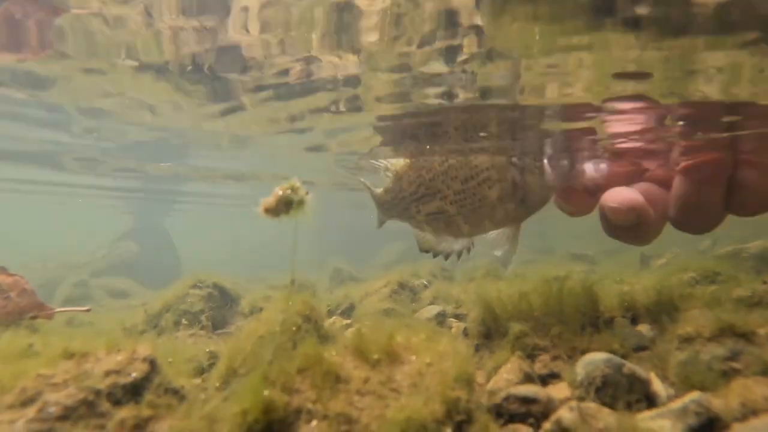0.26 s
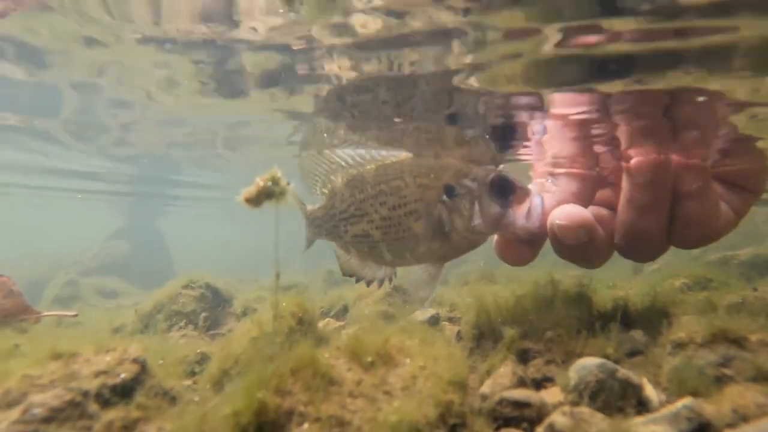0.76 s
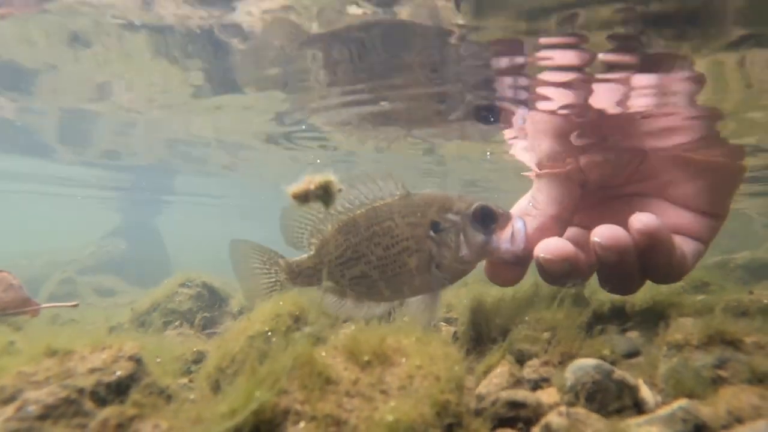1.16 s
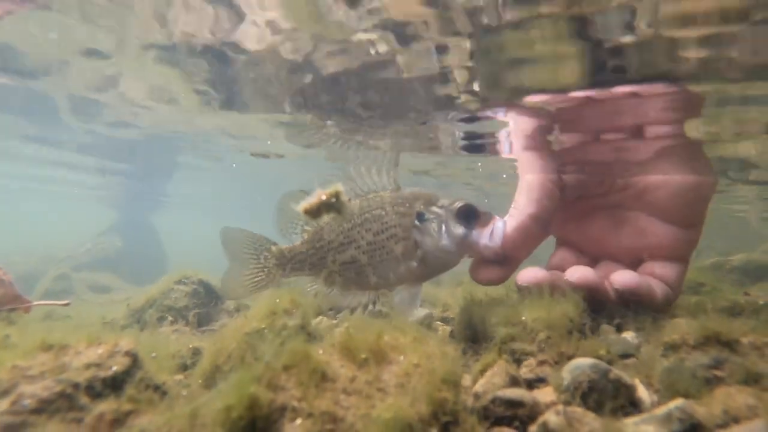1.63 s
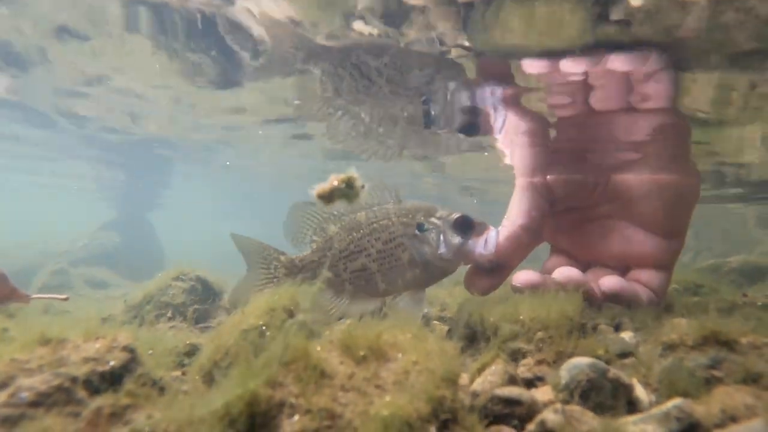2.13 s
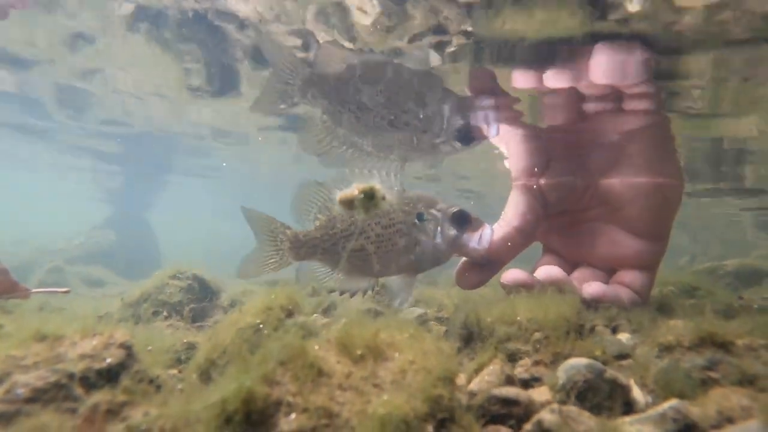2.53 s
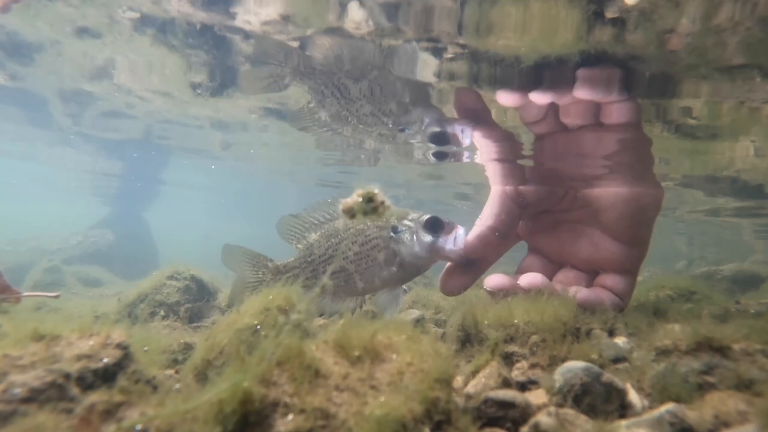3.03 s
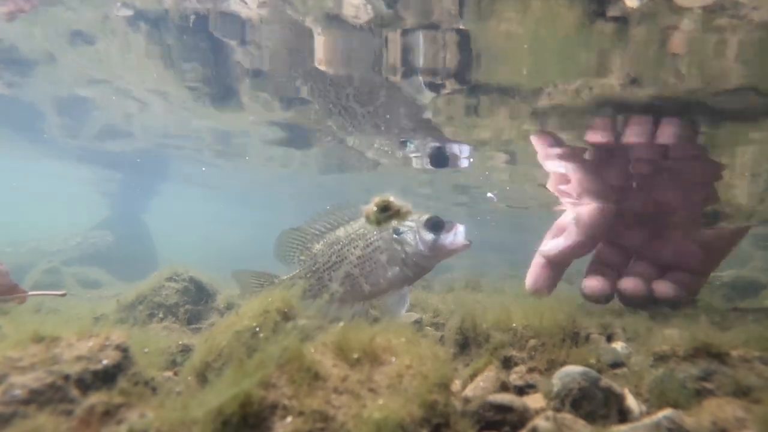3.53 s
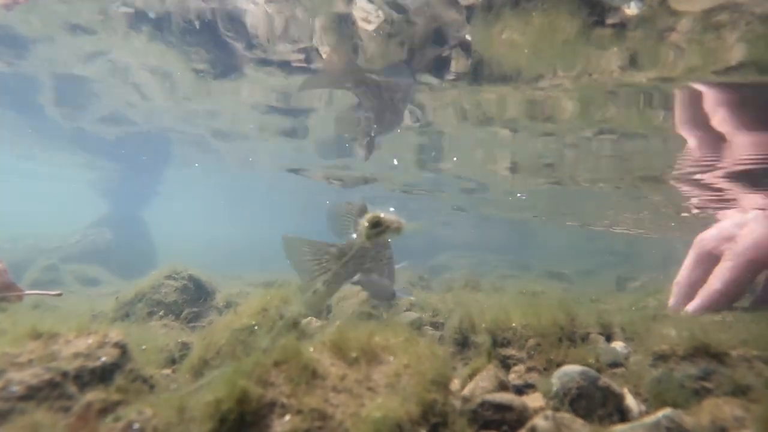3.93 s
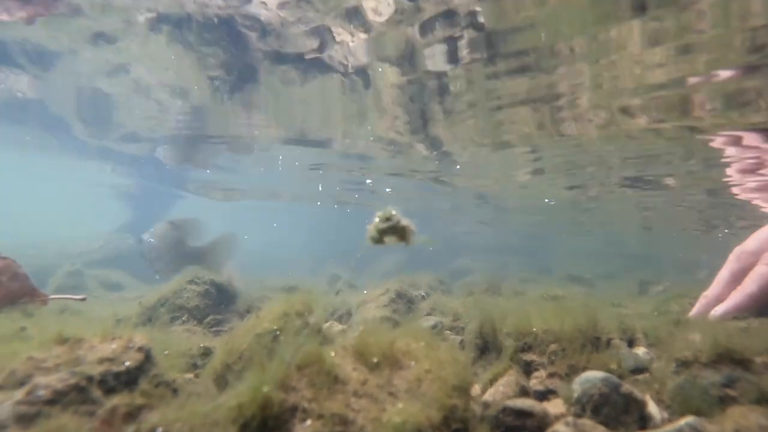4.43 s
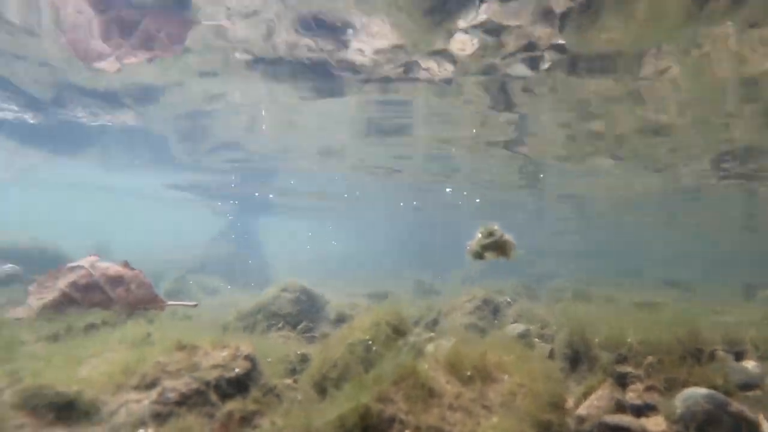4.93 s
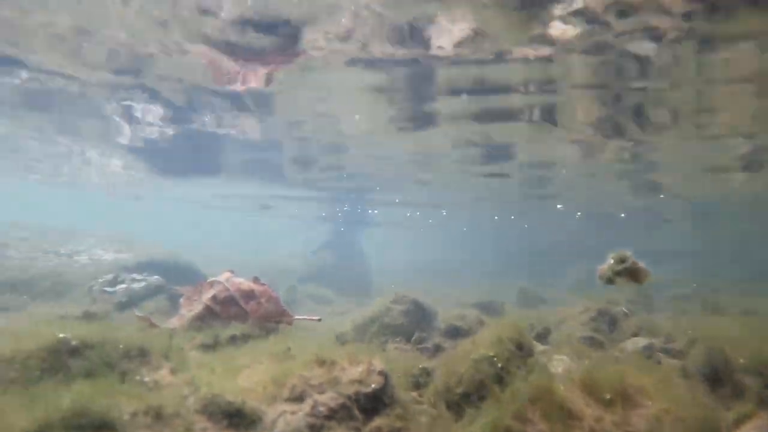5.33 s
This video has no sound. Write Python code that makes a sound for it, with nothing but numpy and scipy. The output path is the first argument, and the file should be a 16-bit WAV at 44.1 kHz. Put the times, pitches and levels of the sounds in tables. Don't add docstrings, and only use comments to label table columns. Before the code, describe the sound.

Muffled underwater rumble surges against a sealed camera while gritty rubs, ticks and hard knocks crowd the first half, then thin out.

```python
import sys
import numpy as np
from scipy import signal
from scipy.fft import rfft, irfft, next_fast_len
from scipy.io import wavfile
from scipy.ndimage import uniform_filter1d, map_coordinates

SR = 44100
rng = np.random.default_rng(int(sys.argv[2]) if len(sys.argv) > 2 else 0)


def invert_db(x):
    u = np.asarray(x, float) / 20
    return 10 ** u


def inscribe(sig):
    pcm = np.round(np.clip(np.atleast_2d(sig).T, -1, 1) * 32767)
    wavfile.write(sys.argv[1], SR, pcm.astype(np.int16))


N = 245637


def unit(x):
    return x / np.sqrt(np.mean(x ** 2) + 1e-20)


def curves(rows):
    s, *cols = np.transpose(rows)
    return [np.interp(np.arange(N) / SR, s, c) for c in cols]


def wobble(rate):
    knots = rng.standard_normal(int(N * rate / SR) + 4)
    return map_coordinates(knots, [np.arange(N) * rate / SR])


def filtered(x, response):
    m = next_fast_len(N + SR // 2)
    return irfft(rfft(x, m) * response(np.fft.rfftfreq(m, 1 / SR)), m)[:N]


def noise(spectrum):
    f, db = np.transpose(spectrum)
    white = rng.standard_normal(N)
    return unit(filtered(white, lambda hz: invert_db(np.interp(np.log(hz + 1), np.log(f + 1), db))))


def even(x, share, size):
    power = np.abs(uniform_filter1d(x ** 2, size))
    return unit(x / (power + 0.03) ** (share / 2))


def swells(rows, rise, fall, rest_db):
    t = np.arange(0, N, 64) / SR
    power = invert_db(2 * rest_db[::64])
    for s, hold, db in rows:
        power = power + invert_db(2 * (db - rise * np.maximum(s - t, 0) - fall * np.maximum(t - s - hold, 0)))
    return np.interp(np.arange(N) / SR, t, 10 * np.log10(power))


def add(track, s, sound):
    part = track[round(s * SR):][:len(sound)]
    part += sound[:len(part)]


def sweep(t, first_ms, growth):
    growth = max(growth, 1.2)
    half_swings = np.log1p(t * 1000 * (growth - 1) / max(first_ms, .1)) / np.log(growth)
    return np.sin(np.pi * half_swings)


def shell(hz):
    # f/Hz, bandwidth/Hz, level/dB
    shell_modes = [(563, 258, 0.5), (1345, 410, -1.5), (1985, 335, -2.5), (2890, 544, -3.5),
                   (3940, 1930, -11.5), (5660, 1300, -40)]
    modes = 0
    for k, (c, width, db) in enumerate(shell_modes):
        modes = modes + (-1) ** k * invert_db(db) * 1j * hz * width / (c * c - hz * hz + 1j * hz * width)
    dead_hz, dead_width_hz, depth = 2440, 890, 0.25
    notch = 1 - depth * 1j * hz * dead_width_hz / (dead_hz ** 2 - hz * hz + 1j * hz * dead_width_hz)
    return notch * modes / (1 + 1j * hz / 5000) ** 2


def self_noise():
    # f/Hz, level/dB per Hz
    hiss_spectrum = [(200, -4), (2000, -25.5), (5000, -42), (6200, -58.5), (7000, -79.5), (16000, -84)]
    return invert_db(-94.5 + 3 * wobble(25)) * noise(hiss_spectrum)


def buzz():
    # start t/s, end t/s
    buzz_spans = [(.12, .15), (.2, .28), (.43, .55), (.66, .69), (.85, .93), (1.02, 1.05), (1.15, 1.27),
                  (1.3, 1.55), (1.75, 1.85), (1.95, 2.2), (2.9, 3.05), (3.25, 3.45), (3.95, 4.05),
                  (4.2, 4.3), (4.5, 4.54), (4.78, 4.82), (4.95, 5), (5.15, 5.5)]
    sputter_db = [-62, -53, -47, -44, -45, -56, -62, -48, -51, -70, -70, -66, -60, -52, -53]
    click_hz, buzz_db, sputter_s = 375, -68, 4.5418
    t, clicks = np.arange(N) / SR, np.zeros(N)
    at = np.arange(0, N - 1, SR / click_hz).round().astype(int)
    active = sum((t[at] > start) & (t[at] < end) for start, end in buzz_spans)
    clicks[at] = invert_db(buzz_db + 3.7 * wobble(45)[at]) * active
    comb = filtered(clicks, lambda hz: 1 / (1 + (4000 / (hz + 1)) ** 4) / (1 + (hz / 13000) ** 16))
    sputter_t = sputter_s + 2 * np.arange(len(sputter_db)) / click_hz
    comb[np.round(sputter_t * SR).astype(int)] += invert_db(sputter_db)
    return comb


def recorder_slips():
    # t/s, jump/full scale, recovery/ms
    slip_events = [
        (.74526, -.03, 3),
        (2.74528, .075, 4),
        (3.74528, -.19, 5),
        (4.74526, -.014, 3),
    ]
    jumps, t = np.zeros(N), np.arange(SR // 40) / SR
    for s, jump, recovery_ms in slip_events:
        add(jumps, s, jump * np.cos(np.pi / 2 * np.clip(t * 1000 / recovery_ms, 0, 1)) ** 2)
    return filtered(jumps, lambda hz: 1 / (1 + (hz / 15800) ** 8))


def end_offsets():
    out, t = np.zeros(N), np.arange(SR // 40) / SR
    opening, closing, ease_s = .125, .09, .012
    ease = np.cos(np.pi / 2 * np.clip(t / ease_s, 0, 1)) ** 2
    add(out, 0, opening * ease)
    add(out, (N - len(t)) / SR, closing * ease[::-1])
    return out


def bubbles():
    # t/s, peak level/dB, f/Hz, t60/s
    bubble_rings = [
        (0.123, -35.5, 1330, 0.04),
        (0.122, -42, 438, 0.021),
        (2.785, -28.5, 121.5, 0.27),
        (3.153, -23, 390, 0.044),
        (3.533, -8, 205, 0.015),
        (3.5464, -15, 231, 0.031),
        (4.11, -16.5, 201, 0.02),
        (4.1197, -11.5, 206, 0.026),
    ]
    out, t = np.zeros(N), np.arange(SR // 8) / SR
    for s, db, hz, t60 in bubble_rings:
        envelope = invert_db(db - 60 * t / t60) * (1 - np.exp(-t / 0.00093))
        add(out, s, envelope * np.sin(2 * np.pi * hz * t * (1 + 0.26 * t)))
    return out


def squeaks():
    # t/s, length/s
    squeak_spans = [(.5, .13), (2.705, .03), (2.748, .085), (3.11, .13), (3.11, .075), (3.13, .045),
                    (3.165, .08), (3.165, .04), (4.68, .52), (4.79, .13), (4.95, .11), (5.31, .07),
                    (5.45, .1), (5.1, .07), (2.766, .024), (4.31, .03)]
    # level/dB, f/Hz, bandwidth/Hz
    squeak_bands = [(-63, 1830, 510), (-59, 2200, 130), (-60, 2130, 90), (-21, 88, 86), (-49.5, 1680, 330),
                    (-30, 368, 36), (-27, 215, 30), (-61, 1600, 490), (-67, 2830, 360), (-51, 767, 120),
                    (-51.5, 820, 170), (-69, 2400, 250), (-68.5, 2960, 326), (-72, 3400, 180),
                    (-49, 1980, 140), (-67, 3100, 1100)]
    out = np.zeros(N)
    for (s, length), (db, centre_hz, width_hz) in zip(squeak_spans, squeak_bands):
        flutter = invert_db(3 * wobble(110)) * rng.standard_normal(N)
        band = filtered(flutter, lambda hz: np.exp(-((hz - centre_hz) / width_hz) ** 4))
        span = round(length * SR)
        add(out, s, invert_db(db) * np.hanning(span) ** 0.19 * unit(band[:span]))
    return out


def knocks():
    # t/s, peak level/dB, first half swing/ms, growth of each swing, t60/s
    blows = [(0.204, -24, 6.7, 0.8, 0.23), (0.352, -18, 4.1, 1.7, 0.068), (0.381, -11, 6.8, 1.3, 0.067),
             (1.437, -22.5, 5, 0.68, 0.22), (4.686, -17, 5.3, 0.94, 0.23), (0.6275, -27.5, 1.3, 4, 0.051),
             (2.4082, -8.5, 0.24, 3.4, 0.12), (2.5934, -20.5, 0.28, 2.8, 0.066),
             (2.6674, -14, 0.26, 2.6, 0.063), (2.7034, -3.5, 0.58, 2.47, 0.067),
             (2.769, -16.5, 1.38, 1.3, 0.044), (2.7771, -12, 0.42, 2.54, 0.055),
             (3.1350, -18.5, 0.66, 1.6, 0.053), (3.138, -11, 0.62, 1.7, 0.046),
             (3.1906, -13.5, 0.84, 1.42, 0.22), (4.4872, -22.5, 1.36, 1.25, 0.021),
             (3.2528, -31.5, 0.88, 2.2, 0.043)]
    out, t = np.zeros(N), np.arange(SR // 8) / SR
    for s, db, first_ms, growth, t60 in blows:
        onset = 1 - np.exp(-t * 1000 / (0.2 * first_ms))
        add(out, s, invert_db(db + 1.0 - 60 * t / t60) * onset * sweep(t, first_ms, growth))
    return signal.sosfilt(signal.butter(10, 2150, fs=SR, output="sos"), out)


def ticks():
    # t/s, peak level/dB, ring f/Hz
    dull_slips = [(0.26, -33.5, 1550), (0.313, -38, 1780), (0.453, -36, 1490), (0.5098, -37, 1830),
                  (0.559, -41, 1730), (0.614, -28.5, 1750), (0.858, -25, 1530), (0.8773, -20, 1550),
                  (0.899, -23, 1570), (0.972, -17, 1570), (1.1413, -27.5, 1640), (1.654, -23.5, 1730),
                  (1.7671, -21, 1650), (1.7773, -24, 1660), (1.8078, -19, 1730), (1.814, -32, 1710),
                  (2.012, -24, 1570), (2.324, -28, 1870), (2.3818, -34, 1800), (2.578, -24, 1610),
                  (2.5932, -9.5, 1710), (2.604, -25, 1870), (2.621, -24, 2040), (2.685, -10.5, 1850),
                  (3.2743, -25, 1860), (3.334, -44, 1760), (4.1089, -17, 1630), (4.118, -16, 1660),
                  (4.992, -32, 1950), (5.1544, -37.5, 1760)]
    # t/s, peak level/dB, ring f/Hz, rattle f/Hz
    sharp_slips = [(0.3533, -29.5, 1600, 2720), (0.377, -24.5, 1290, 2620), (0.983, -37, 1690, 3560),
                   (1.1693, -29, 1820, 3150), (1.5664, -32, 1650, 3180), (1.597, -29.5, 1720, 3320),
                   (1.6028, -23, 1670, 3260), (1.8796, -31.5, 1740, 3900), (1.9723, -22, 1550, 3400),
                   (2.0162, -25, 1680, 2680), (2.1057, -28.5, 2040, 3050), (2.1106, -35, 1640, 3200),
                   (2.303, -26, 1540, 3170), (2.3142, -26.5, 1800, 3180), (2.4934, -23, 1800, 3240),
                   (2.505, -27.5, 1730, 3360), (2.6347, -19.5, 1500, 3000), (2.645, -18, 1610, 2940),
                   (2.6929, -18, 2240, 2860), (2.84, -30, 1710, 3280), (2.8646, -26.5, 1970, 3180),
                   (3.322, -30.5, 1570, 3310), (3.3488, -27.5, 1760, 3200), (3.415, -27, 1720, 3600),
                   (3.431, -26.5, 1910, 3900), (3.53, -16, 1480, 3600), (3.5435, -17.5, 1800, 3870),
                   (3.548, -19.5, 2000, 3270), (3.5926, -33.5, 1630, 3030), (3.5985, -30.5, 1660, 3070)]
    # t/s, peak level/dB
    heavy_slips = [(0.423, -35), (0.486, -42.5), (0.8845, -28.5), (1.215, -34.5), (1.794, -31),
                   (2.0761, -33.5), (2.479, -38), (3.129, -37.5), (3.1974, -40), (3.253, -28.5),
                   (3.84, -30.5), (4.154, -38.5), (4.385, -39), (4.419, -58), (4.44, -56.5), (4.577, -40),
                   (4.598, -47), (1.373, -51), (0.464, -42.5), (2.9723, -48), (3.0077, -44.5), (1.269, -53),
                   (3.9522, -51), (4.245, -44), (2.171, -45), (1.4423, -39.5), (5.173, -46)]
    faint_slips = [(0.041, -38.5), (.072, -38), (0.21, -48), (0.662, -52), (1.0586, -36.5), (1.44, -34),
                   (1.517, -36), (1.9166, -34), (2.269, -37), (2.5496, -32.5), (2.7283, -32), (2.797, -35),
                   (2.804, -31.5), (3.045, -38.5), (3.067, -36), (3.1334, -43), (3.2423, -36.5),
                   (3.523, -37), (3.2, -31), (3.796, -39), (3.862, -41), (4.0255, -41.5), (4.2985, -35),
                   (4.517, -38.5), (4.301, -36), (4.7625, -34), (4.8253, -35), (5.1602, -38),
                   (5.2493, -39.5), (5.3269, -43)]
    crackle_slips = [(0.327, -40), (0.3362, -38), (0.5186, -41), (0.571, -57), (0.6274, -44), (0.827, -54),
                     (0.835, -51), (0.9454, -25), (0.9629, -30), (1.1304, -52), (1.1496, -32.5),
                     (1.2713, -42), (1.488, -39), (1.543, -41), (1.556, -35), (1.6202, -33), (1.715, -37),
                     (1.7385, -32), (1.7874, -30), (1.8525, -46), (1.868, -31), (1.9057, -36.5),
                     (1.9867, -39), (2.027, -24), (2.2047, -40), (2.2108, -42), (2.2878, -37),
                     (2.2907, -28.5), (2.359, -38), (2.5884, -36), (2.6084, -36), (2.6671, -13),
                     (2.7144, -37), (2.7206, -38), (3.1057, -42), (3.1883, -33), (3.2885, -31.5),
                     (3.354, -48), (3.4046, -34), (3.4495, -33), (3.6453, -43), (3.693, -45), (3.699, -41),
                     (3.712, -42), (3.8263, -38), (4.033, -40.5), (4.131, -40), (4.19, -40), (4.208, -38.5),
                     (4.2178, -46), (4.3314, -44), (4.499, -43), (4.5994, -42), (4.802, -39), (4.842, -40),
                     (4.8898, -34.5), (4.9232, -45), (4.9807, -37), (5.0166, -36.5), (5.2523, -49),
                     (5.3383, -43), (5.3544, -55), (4.6349, -31), (4.6852, -40.5), (4.392, -50),
                     (3.7195, -46), (5.058, -43), (5.09, -46), (5.019, -41), (1.7655, -30), (3.774, -38)]
    # rattle level/dB, thud level/dB
    slip_kinds = [
        (-29, -7),
        (-0.5, 1.5),
        (-14.5, 6.5),
        (1.5, -4),
        (-2.5, -1.5),
    ]
    out, scratch, t = np.zeros(N), np.zeros(N), np.arange(SR // 25) / SR
    groups = (dull_slips, sharp_slips, heavy_slips, faint_slips, crackle_slips)
    slips = [(row, *kind) for rows, kind in zip(groups, slip_kinds) for row in rows]
    chance = rng.standard_normal((len(slips), 5))
    grain = rng.standard_normal((len(slips), len(t)))
    rise = 1 - np.exp(-t / .0003)
    for ((s, db, *known), bright_db, thud_db), (a, b, c, d, e), rough in zip(slips, chance, grain):
        drawn = [1700 * invert_db(1.2 * a), 3150 * invert_db(0.87 * b)]
        ring_hz, rattle_hz = [*known, *drawn[len(known):]]
        ring = invert_db(1.0 - 60 * t / 0.0051) * np.sin(2 * np.pi * ring_hz * t)
        rattle = np.sin(2 * np.pi * rattle_hz * t)
        rattle += 0.27 * np.sin(2 * np.pi * 4300 * invert_db(0.5 * c) * t)
        rattle += 0.1 * np.sin(2 * np.pi * 5600 * invert_db(0.7 * d) * t)
        rattle *= invert_db(bright_db + 2.0 - 60 * t / 0.0025)
        thud = invert_db(thud_db - 3.0 - 60 * t / 0.039) * sweep(t, 0.76 * invert_db(2.92 * e), 1.95)
        add(out, s, invert_db(db) * rise * (ring + rattle + thud))
        add(scratch, s, invert_db(db - 3.5 - 60 * t / 0.021) * rough)
    return out + filtered(scratch, shell)


def rubbing():
    # t/s, contact level/dB, dryness/dB (drier skin is brighter)
    grip = [(0, -72, -6), (.1, -76.5, -3), (.26, -70, -12), (.62, -78.5, -16), (.76, -77.5, -8.5),
            (1.1, -68.5, 2.5), (1.22, -69, -0.5), (1.4, -70, 3), (1.6, -69.5, 1.5), (2.5, -67, 3.5),
            (2.9, -72, 3.5), (3.3, -70, 4), (3.95, -70.5, 1.5), (4.3, -67.5, -4), (4.37, -68, 3.5),
            (4.89, -60, 6), (5.2, -72.5, 0), (5.57, -62, 6.5)]
    # t/s, hold/s, grit level/dB, groan level/dB
    strokes = [(0.0, 0.0052, -61, -41), (0.12, 0.017, -68.5, -57), (0.303, 0.038, -52, -38),
               (.35, 0.035, -54.5, -41), (0.83, 0.022, -62.5, -38), (0.85, 0.02, -47.5, -31),
               (0.874, 0.015, -45, -31), (0.894, 0.051, -48.5, -33.5), (.936, 0.051, -51, -35),
               (1.13, 0.055, -53.5, -35), (1.209, 0.012, -53, -45), (1.429, 0.042, -57, -31.5),
               (1.509, 0.044, -55, -37.5), (1.552, 0.025, -51.5, -33), (1.576, 0.02, -59, -50),
               (1.596, 0.0093, -45.5, -31.5), (1.612, 0.035, -52, -43), (1.648, 0.031, -43, -21),
               (1.68, 0.026, -54.5, -42), (1.708, 0.047, -47, -34), (1.74, 0.075, -45.5, -32.5),
               (1.82, 0.018, -51, -35), (1.852, .035, -53, -34), (1.972, 0.024, -43.5, -41),
               (2.01, 0.026, -46, -25), (2.045, 0.031, -54, -42), (2.068, 0.041, -49, -27),
               (2.115, 0.027, -53.5, -31.5), (2.168, 0.019, -56.5, -39), (2.203, 0.037, -55.5, -31.5),
               (2.267, 0.016, -63, -44.5), (2.283, 0.056, -51, -30.5), (2.339, 0.037, -56.5, -44),
               (2.382, 0.012, -49, -33), (2.398, 0.022, -47, -26), (2.419, .065, -51, -35.5),
               (2.492, 0.026, -52.5, -30), (2.518, 0.06, -55.5, -31),
               (2.584, 0.12, -39.5, -17), (2.702, 0.032, -52.5, -44), (2.755, 0.029, -55, -46),
                    (2.77, 0.023, -63, -41), (2.812, 0.029, -57.5, -47), (2.844, 0.019, -56, -42),
                    (3.058, 0.026, -56.5, -36), (3.114, 0.016, -60, -38), (3.135, 0.026, -55.5, -20),
                    (3.162, 0.027, -59, -27), (3.23, 0.043, -55, -35), (3.27, 0.011, -49.5, -27),
                    (3.317, 0.033, -54.5, -29), (3.354, 0.068, -58, -32), (3.398, 0.048, -51.5, -26.5),
                    (3.447, 0.024, -54, -28.5), (3.521, 0.012, -60, -35), (3.532, 0.034, -51.5, -26),
                    (3.553, 0.045, -55, -28.5), (3.694, 0.084, -58, -34.5), (4.098, 0.0083, -53, -48),
                    (4.111, 0.013, -56.5, -23), (4.458, 0.04, -60, -42), (4.503, 0.032, -56.5, -41),
                    (4.562, 0.033, -58.5, -34), (4.604, 0.048, -57.5, -43), (4.67, 0.026, -60, -43),
                    (4.71, 0.045, -58.5, -39), (4.756, 0.022, -54, -46), (4.793, 0.011, -54.5, -39),
                    (4.824, 0.041, -52.5, -35), (4.885, 0.015, -48, -40), (4.907, 0.032, -55.5, -44),
                    (4.969, 0.031, -56, -43), (5.006, 0.036, -57, -41), (5.328, 0.028, -55.5, -34.5),
               (0.018, 0.031, -65, -54), (0.172, 0.11, -66.5, -62), (0.413, 0.056, -65.5, -54),
                     (0.504, 0.076, -66.5, -54.5), (0.654, 0.018, -63, -42.5), (2.988, 0.097, -73, -48.5),
                     (3.803, 0.083, -78, -40.5), (3.974, 0.072, -71, -46), (4.285, 0.037, -68, -48),
                     (4.412, 0.1, -87, -29.5), (5.034, 0.15, -68.5, -46), (5.244, 0.017, -57, -36),
                     (5.452, 0.2, -62.5, -38)]
    # t/s, grit level/dB, groan level/dB
    jabs = [(0, -59, -32), (.126, -58, -50), (0.429, -70, -45), (1.445, -52, -34.5), (1.558, -44, -46),
            (5.3, -56.5, -30), (2.406, -37, -38), (2.78, -48, -29), (2.862, -45.5, -43), (3.131, -54, -12),
            (3.199, -58.5, -36.5), (3.279, -51.5, -51), (3.543, -53, -33), (3.747, -55, -21.5),
            (3.837, -56.5, -50), (4.118, -67, -26.5), (4.21, -67, -43), (5.181, -62.5, -26),
            (.56, -72, -47), (1.32, -64, -41), (3.646, -65.5, -34), (2.171, -52.5, -43), (4.701, -73, -47),
            (5.252, -73, -22.5), (5.335, -48.5, -28), (5.474, -52, -41), (5.569, -72, -18)]
    # f/Hz, level/dB per Hz
    groan_spectrum = [(60, -25), (110, -0.5), (200, -7), (400, -18.5), (700, -27), (1100, -45),
                      (3000, -100)]
    rest_db, dry_db = curves(grip)
    rubs = strokes
    rubs += [(s, 0, grit, groan) for s, grit, groan in jabs]
    grit_db = swells([(s, hold, db) for s, hold, db, _ in rubs], 3100, 1200, rest_db)
    groan_db = swells([(s, hold, db) for s, hold, _, db in rubs], 1200, 1400, rest_db + 22)
    clumps = 0.9 * wobble(40) + 2.6 * wobble(220)
    struck = rng.random(N) < 2500 / SR
    grains = struck * rng.standard_normal(N) * invert_db(1.6 * rng.exponential(size=N))
    grit = unit(filtered(invert_db(clumps) * (unit(grains) + .5 * rng.standard_normal(N)), shell))
    dull = filtered(grit, lambda hz: 1 / (1 + 1.1j * hz / 3600 - (hz / 3600) ** 2) ** 2)
    pressure = np.clip((grit_db + dry_db + 67) / 18, 0, 1)
    groan = invert_db(1.44 * clumps) * even(noise(groan_spectrum), 0.042, size=700)
    grit_mix = pressure * grit + (1 - pressure) * dull
    return invert_db(grit_db + 2.5) * grit_mix + invert_db(groan_db - 8.0) * unit(groan)


def water():
    # t/s, level/dB
    flow = [(0, -26), (.4, -20.5), (.62, -23), (.7, -17), (.8, -31.5), (.98, -16), (1.1, -19), (1.8, -18),
            (2.1, -20.5), (2.5, -19), (2.7, -24), (2.9, -28), (3.4, -21), (3.6, -22.5), (3.97, -26.5),
            (4.4, -20), (4.85, -18.5), (5.57, -18.5)]
    # t/s, peak level/dB
    eddies = [(0, -21), (.25, -25), (.38, -23.5), (.54, -24.5), (0.875, -17), (.98, -33), (1.15, -32),
              (1.569, -24), (1.78, -18.5), (2.08, -23.5), (2.34, -33), (2.441, -21.5), (2.68, -16.5),
              (3.14, -27), (3.21, -19.5), (3.431, -26.5), (3.6, -35), (3.769, -24), (3.971, -32.5),
              (4.18, -26.5), (4.299, -23.5), (4.5, -19), (4.693, -19.5), (4.78, -17), (2.86, -38),
              (1.303, -25), (5.361, -23.5), (5.067, -19), (5.29, -20.5), (5.518, -18)]
    # f/Hz, level/dB per Hz
    surge_spectrum = [(3, -4), (5, -1), (16, 2.5), (28, -5), (45, -27.5), (120, -86)]
    slosh_spectrum = [(15, -28.5), (30, -2.5), (50, -0.5), (90, -18), (150, -34), (400, -80.5)]
    surge_db, = curves(flow)
    calm_db = surge_db - 14.5
    slosh_db = swells([(s, 0, db) for s, db in eddies], 150, 129, calm_db)
    surge = even(noise(surge_spectrum), .8, size=4000)
    slosh = even(noise(slosh_spectrum), .6, size=1600)
    push = invert_db(surge_db + 0.5) * surge + invert_db(slosh_db) * slosh
    return push / (1 + (push / .29) ** 4) ** .25


def scene():
    inside = bubbles() + squeaks() + knocks() + ticks() + rubbing() + water()
    return filtered(inside, lambda hz: 1 / (1 + 1.3j * hz / 6000 - (hz / 6000) ** 2) ** 2)[None]


def top_cut(x):
    return signal.sosfilt(signal.butter(12, 15900, fs=SR, output="sos"), x)


def record(dry):
    return top_cut(dry + recorder_slips() + end_offsets() + self_noise() + buzz())


dry = scene()
out = record(dry)
inscribe(out)
```